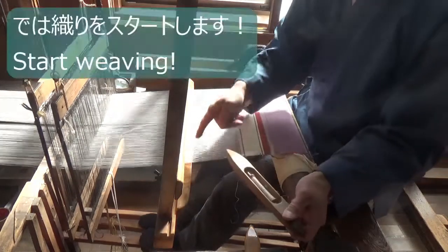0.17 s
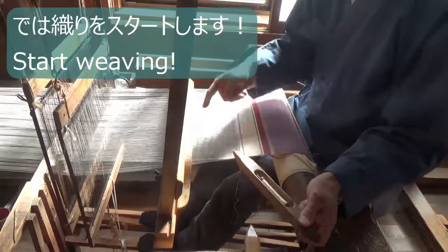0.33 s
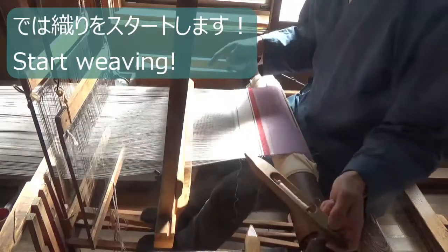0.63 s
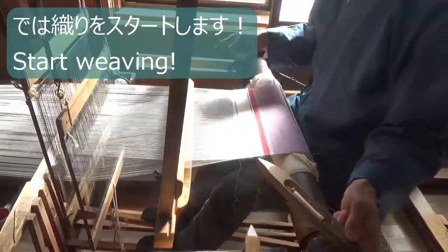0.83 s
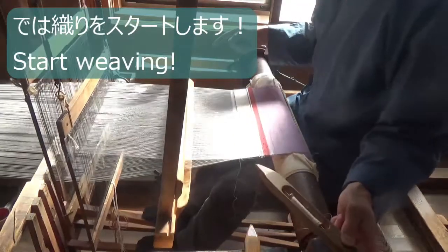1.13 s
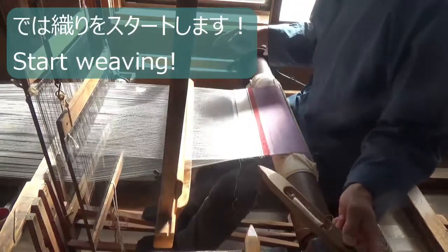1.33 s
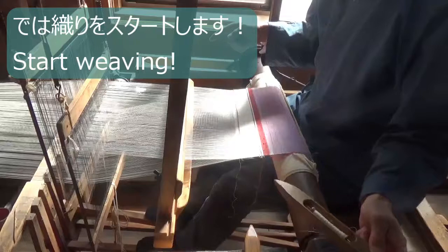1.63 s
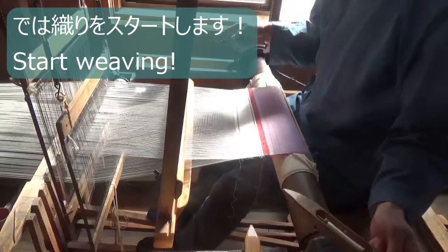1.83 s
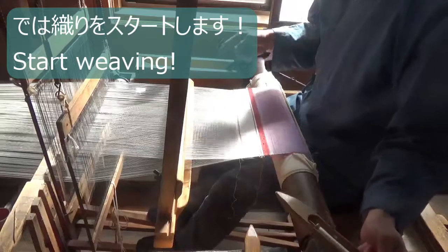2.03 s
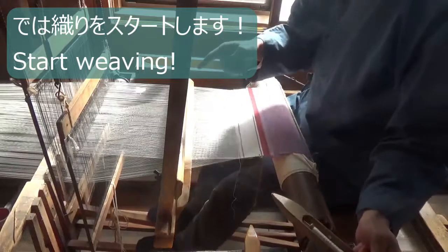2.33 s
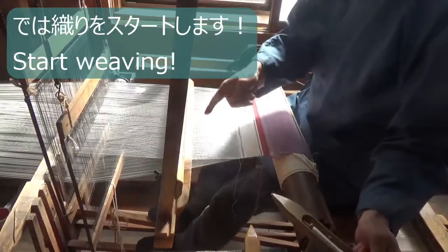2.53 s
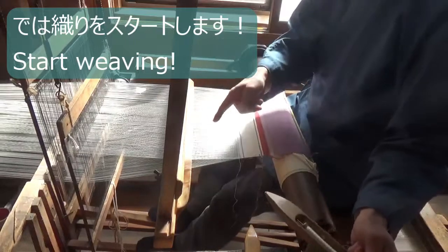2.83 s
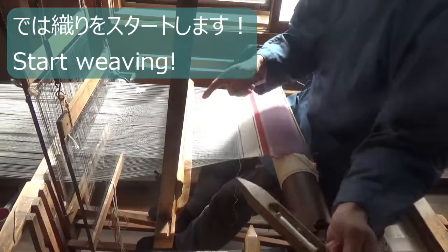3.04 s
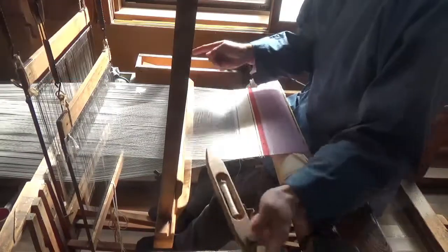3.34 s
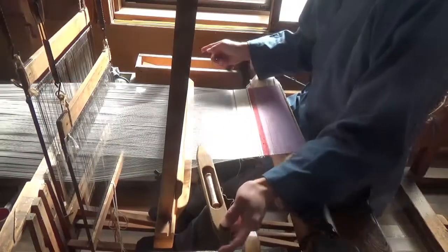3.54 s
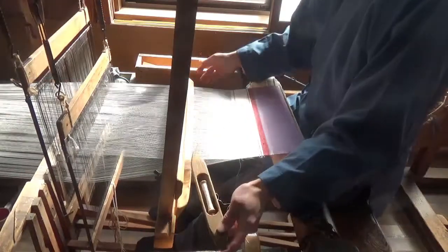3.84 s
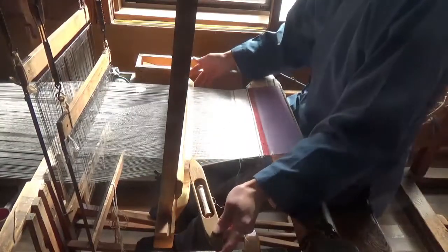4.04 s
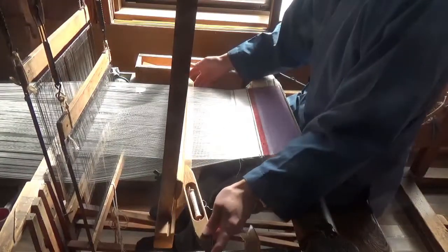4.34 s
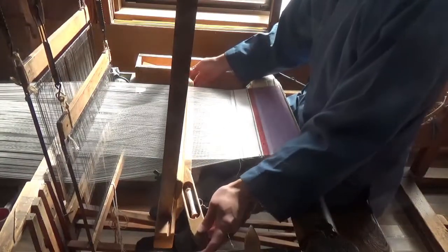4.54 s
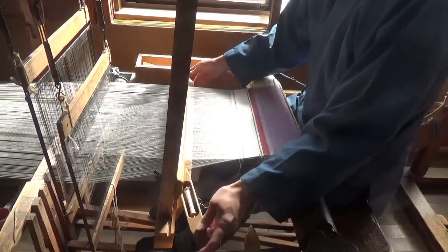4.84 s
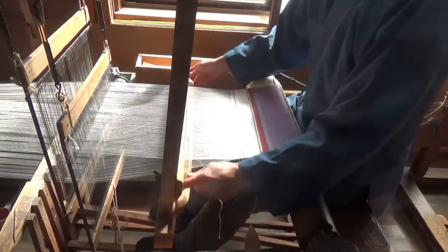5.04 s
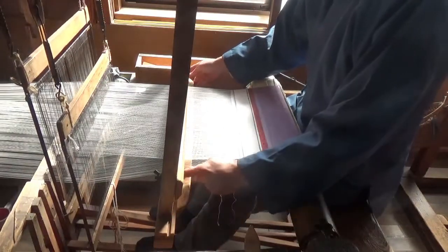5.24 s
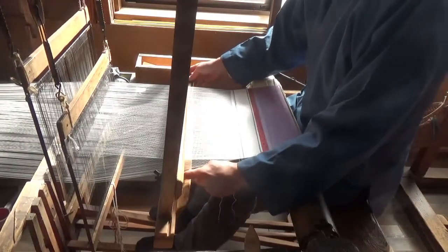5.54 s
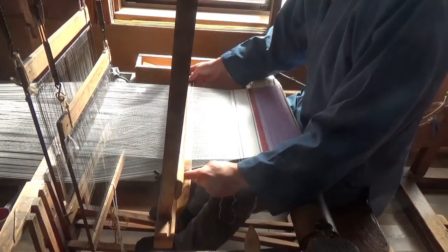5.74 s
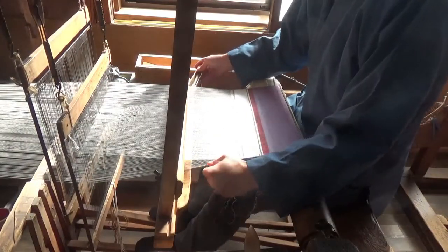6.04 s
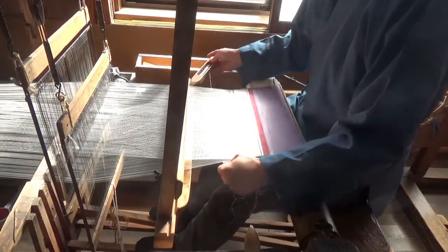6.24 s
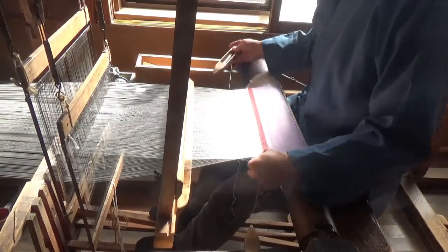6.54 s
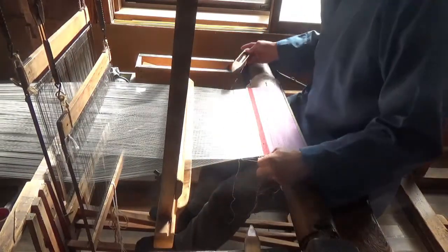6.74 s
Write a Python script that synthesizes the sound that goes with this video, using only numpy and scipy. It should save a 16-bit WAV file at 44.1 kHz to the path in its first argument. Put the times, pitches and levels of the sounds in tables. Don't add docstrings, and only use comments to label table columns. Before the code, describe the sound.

A wooden handloom heard close in a small, quiet workshop with a short reverberation, soft hiss and a very faint low machine hum. At 0.2 s a firm clack and heddle rattle come with a brushing scrape and sleeve rustle, then a hard wooden knock at 0.36. From 0.5 to 3.5 s a steel hook swings, ticking about every sixth of a second, gradually fainter. A shuttle clack falls at 0.6, a sharp ringing stick strike at 1.75, woody knocks at 1.84, 2.0 and 2.96, with dull treadle thuds between. It grows sparse until a strong beater clack with small rebounds at 4.44. From 4.88 to 5.3 s the thrown shuttle makes a loud, dense, bright clattering rattle, dying by 5.5. Light clicks and sliding follow, with a cluster of clacks at 6.0-6.2 as it is lifted out, another at 6.33, then quiet cloth rustle.

```python
import sys
import numpy as np
from scipy import signal
from scipy.fft import rfft, irfft, next_fast_len
from scipy.io import wavfile

SR = 44100
rng = np.random.default_rng(int(sys.argv[2]) if len(sys.argv) > 2 else 0)


def volts(x):
    e = np.asarray(x, float) / 20
    return 10 ** e


def transcribe(signal):
    frames = np.atleast_2d(signal).T
    limited = np.clip(frames, -1, 1)
    pcm = np.round(limited * 32767).astype(np.int16)
    wavfile.write(sys.argv[1], SR, pcm)


N = 303408

# (frequency [Hz], width [Hz], level [dB])
FRAME_MODES = [(170, 19, 9), (282, 187, 0), (426, 80, 0.5), (559, 67, 1.5), (714, 114, 1),
               (1005, 680, -2.5), (1620, 980, -4)]
# (frequency [Hz], width [Hz], level [dB])
RACE_MODES = [(170, 18, -5), (370, 103, -5), (530, 123, -2), (824, 95, -7), (1065, 106, -1),
              (1670, 390, -9)]
# (time [s], hiss level [dB], hum level [dB])
BACKGROUND = [(0, -51.5, -65), (.25, -53.5, -62.5), (.6, -52.5, -69.5), (1.16, -57.5, -58),
              (1.45, -57, -60), (1.68, -55, -52.5), (1.8, -52, -65), (2.2, -52.5, -65), (2.73, -56.5, -61),
              (3.07, -55, -59), (3.3, -57.5, -58), (4.4, -57.5, -60), (4.7, -58, -70), (4.9, -53, -62),
              (5.62, -58.5, -66), (5.85, -60.5, -78), (6.2, -59.5, -65), (6.88, -55.5, -70)]


def unit(x):
    return x / np.sqrt(np.mean(x ** 2) + 1e-20)


def along(points, hz):
    f, v = np.transpose(points)
    return np.interp(np.log(hz + 1), np.log(f + 1), v)


def curves(rows):
    s, *cols = np.transpose(rows)
    return [np.interp(np.arange(N) / SR, s, c) for c in cols]


def filtered(x, response):
    m = next_fast_len(x.shape[-1] + 2048)
    return irfft(rfft(x, m) * response(np.fft.rfftfreq(m, 1 / SR)), m)[..., :x.shape[-1]]


def body(modes):
    def response(f):
        total = 0
        for k, (centre, width, db) in enumerate(modes):
            damping = 1j * f * width
            total = total + (-1) ** k * volts(db) * damping / (centre * centre - f * f + damping)
        return total
    return response


def burst(t60, rise, response, snap=0, size=6000):
    t = np.arange(size) / SR
    force = rng.standard_normal(size) * volts(-60 * t / t60) * (1 - np.exp(-t / rise))
    force[1] += snap
    x = filtered(force, response)
    return x / np.abs(x).max()


def add(out, s, x, wet_db):
    # (frequency [Hz], t60 [s])
    room_decay = [(150, 0.68), (600, 0.3), (3000, 0.34), (6000, 0.27), (11000, 0.16)]
    # (frequency [Hz], level [dB])
    tail_width = [(150, -15.5), (900, -12), (3000, -21.5), (6000, -13), (11000, -6.5)]
    hz, t, z = signal.stft(rng.standard_normal((2, SR // 3)), SR, nperseg=256)
    z[1] *= volts(along(tail_width, hz))[:, None]
    decay = volts(-60 * t / along(room_decay, hz)[:, None])
    mid, side = signal.istft(z * decay, SR, nperseg=256)[1]
    tail = np.array([mid + side, mid - side]) / np.linalg.norm(mid)
    delayed = np.pad(x, (130, 0))[None]
    heard = volts(wet_db) * signal.fftconvolve(delayed, tail, axes=1)
    heard[:, :len(x)] += x
    part = out[:, max(round(s * SR), 0):][:, :heard.shape[1]]
    part += heard[:, :part.shape[1]]


def clacks():
    # (time [s], peak [dB], pitch [Hz], crack [dB], contact t60 [s])
    ready = [
        (0.1712, -26.5, 3300, -5, 0.13),
        (0.219, -14, 3400, -3, 0.012),
        (0.5988, -18, 4300, -9, 0.017),
        (0.9005, -30, 1550, -25, 0.015),
        (0.5994, -22, 2850, -12, 0.02),
        (1.465, -24, 5100, 17, 0.06),
        (2.0157, -17, 5900, 1, 0.047),
        (4.6932, -21, 2480, -4, 0.041),
    ]
    # (time [s], peak [dB], pitch [Hz], crack [dB])
    throw = [(4.877, -23, 2980, -15), (4.8872, -17, 3020, -20), (4.892, -6.5, 3660, -13),
             (4.905, -2, 4560, -2), (4.9145, 1, 5660, -4), (4.918, -3, 7000, -6), (4.9385, -8, 6700, 0),
             (4.958, 5.5, 6550, 14), (4.9796, -2, 4960, -4), (4.9875, -4, 5100, 3), (5.004, 6, 5300, -4),
             (5.0157, -2, 5100, -6), (5.027, 1, 5250, 3), (5.0297, 7.5, 9500, 5), (5.04, -5, 3020, -8),
             (5.053, -7, 5200, -1), (5.0683, 3.5, 7900, -13), (5.081, 5, 5750, -5), (5.093, 1, 3100, -3),
             (5.099, -3, 8200, -6), (5.1118, 2, 4240, -5), (5.12, -6, 4200, -15), (5.129, -10, 6000, 0),
             (5.1352, 0, 5070, -2), (5.144, 0, 7000, -11), (5.163, -6, 3020, -12), (5.2094, 1, 2800, -2),
             (5.2185, -8, 2850, -3), (5.232, -8, 3030, -24), (5.2325, -6.5, 5270, -26),
             (5.243, -11, 2900, -32), (5.252, -8, 3080, -28), (5.264, -6, 2900, -23.5),
             (5.2731, -7.5, 3130, -32), (5.282, -11, 3000, -24), (5.295, -7, 6640, -7),
             (5.3, -12, 6750, -8)]
    # (time [s], peak [dB], pitch [Hz], crack [dB])
    catch = [(5.441, -24, 6940, -6), (5.453, -19, 4250, -14), (5.458, -24, 6700, -15),
             (5.559, -30, 1950, -30.5), (5.7745, -28, 4400, -9), (5.8368, -34, 2550, -26),
             (5.9098, -21, 6840, -12), (6.003, -22, 3300, -3), (6.0095, -24, 6900, -4),
             (6.0408, -8, 3500, -4), (6.043, -12.5, 7500, -11), (6.047, -17, 4870, -12),
             (6.063, -20, 3120, -9), (6.0872, -18, 4800, -2), (6.106, -11.5, 3400, -4),
             (6.108, -24, 7800, -8), (6.1355, -16, 3900, -2), (6.142, -25, 4800, -6),
             (6.159, -18.5, 8200, -3), (6.327, -18, 4780, -6.5), (6.4725, -33.5, 3670, -16)]
    rows = [(*row, -24.5) for row in ready]
    rows += [(*row, 0.018, -30.5) for row in throw]
    rows += [(*row, 0.016, -61) for row in catch]
    out = np.zeros((2, N))
    for s, db, hz, crack_db, t60, thump_db in rows:
        def colour(f):
            pitch = body([(hz, 0.17 * hz, 0)])(f) ** 2
            crack = body([(4500, 5500, 0)])(f) * 1j * f / (1500 + 1j * f) / (1 + 1j * f / 9000)
            return pitch + volts(crack_db) * crack
        blow = burst(t60, 0.0005, colour, snap=4, size=4500)
        thump = burst(0.04, 0.004, body(RACE_MODES), size=4500)
        add(out, s + 0.0006, volts(db - 3.0) * (blow + volts(thump_db) * thump), wet_db=-5.5)
    return out


def chatter(modes, per_s, spread_db, fill):
    draw = rng.random((2, N))
    hits = (draw[0] < per_s / SR) * volts(-spread_db * np.log(1.06 - draw[1]))
    shake = signal.lfilter([1], [1, -np.exp(-1 / (0.002 * SR))], hits)
    return unit(filtered((unit(shake) + fill) * rng.standard_normal(N), body(modes)))


def rattle():
    # (time [s], sliding [dB], pressure on the reed [dB])
    drags = [
        [(0.2, -45, 22), (0.216, -42.5, 7), (0.288, -74, 0), (0.33, -68, 13), (0.35, -51, -1)],
        [(4.83, -55, -40), (4.9, -32, 8), (4.95, -39, 10.5), (4.995, -22, -4), (5.03, -24, 7),
         (5.136, -24.5, 7.5), (5.2, -27.5, 1), (5.272, -27.5, 3.5), (5.39, -47.5, 1.5)],
        [(5.36, -44, -11), (5.43, -46.5, -18), (5.45, -40, -15), (5.5, -48, -12), (5.53, -86, -21),
         (5.565, -50.5, -21), (5.64, -100, -21)],
        [(5.776, -55, 12), (5.886, -61.5, 8), (5.92, -62, 0)],
        [(5.911, -52, 6), (5.96, -52, 10), (6.01, -46.5, 1), (6.04, -55, 5)],
        [(6.043, -48, 24), (6.085, -55.5, 17), (6.19, -67, 24), (6.24, -76, 4)],
    ]
    # (bar [dB], wires [dB], wires fade [dB per s], race [dB], shuttle [dB])
    touch = [
        (0, 6, -73, -12, 6),
        (2.5, 5.5, -1.5, 1, -16),
        (0, -3, 3, -5, -2),
        (0, -3, -21, 7.5, 1),
        (0, 2, 0, -7, 2),
        (0, -3.5, -12, -15, -1),
    ]
    # (frequency [Hz], width [Hz], level [dB])
    bar_modes = [(2524, 110, -10), (2900, 120, -7.5), (3110, 130, -10), (3540, 450, -11.5)]
    wire_modes = [(4620, 1600, -15), (4880, 520, -21.5), (4904, 240, 10), (6150, 710, 6.5), (7180, 1650, 3),
                  (8860, 580, -4.5), (9500, 810, -12), (9440, 210, -45.5), (11100, 780, -2)]
    shuttle_modes = [(1950, 410, 10.5), (4150, 430, 13.5), (6840, 140, 12.5)]
    out, t = np.zeros((2, N)), np.arange(N) / SR
    bar = volts(-8.5) * chatter(bar_modes, per_s=280, spread_db=14, fill=1.0)
    wires = volts(-7.5) * chatter(wire_modes, per_s=500, spread_db=2.5, fill=1.0)
    race = volts(-5.0) * chatter(RACE_MODES, per_s=83, spread_db=4, fill=1.0)
    shuttle = volts(5) * chatter(shuttle_modes, per_s=100, spread_db=1, fill=1.3)
    for rows, (bar_db, wires_db, fade_db, race_db, shuttle_db) in zip(drags, touch):
        slide_db, press_db = curves(rows)
        span = slice(round(rows[0][0] * SR), round(rows[-1][0] * SR))
        fading_db = wires_db + fade_db * (t[span] - rows[1][0])
        reed = volts(bar_db) * bar[span] + volts(fading_db) * wires[span]
        sliding = volts(race_db) * race[span] + volts(shuttle_db) * shuttle[span]
        drag = volts(slide_db[span]) * (volts(press_db[span]) * reed + sliding)
        add(out, rows[0][0], drag, wet_db=-8.0)
    return out


def frame_boom(db):
    return volts(db) * burst(0.28, 0.007, lambda f: body(FRAME_MODES)(f) / (1 + 1j * f / 450), size=12000)


def blows():
    # (time [s], peak [dB], contact t60 [s], frame boom [dB], room [dB])
    hits = [
        (0.1985, -13, 0.08, -31, -2.5),
        (0.2189, -24, 0.018, -34, 5),
        (1.7432, -34, 0.025, -16, -1),
        (1.7475, -9, 0.016, -15, -5),
        (1.7548, -12, 0.02, -16.5, -8),
        (4.433, -19, 0.03, -37, -4),
        (4.4418, -2.5, 0.014, -34, -6.5),
        (4.449, -12, 0.052, -43, 0.5),
        (4.466, -21, 0.056, -40, -3),
        (4.4782, -24, 0.03, -46, 4),
    ]
    struck = [0, 0, 1, 1, 1, 2, 2, 3, 3, 3]
    hardness = [
        1.5,
        5,
        3,
        1.5,
    ]
    # (frequency [Hz], width [Hz], level [dB])
    heddles = [(2340, 130, -9), (3370, 170, -4), (5400, 410, -9), (6420, 370, 1.5), (7540, 390, -5.5),
               (9100, 400, -7), (10850, 550, -10.5)]
    stick = [(1386, 40, -9), (1720, 130, -8), (2115, 60, 5), (2710, 70, -6), (3020, 90, -12),
             (3450, 45, -1), (3580, 37, -10.5), (4030, 60, -9), (4640, 46, -13.5), (4950, 50, -15),
             (5440, 60, -13), (6212, 67, -15), (6460, 70, -18), (8200, 3500, -24)]
    beater = [(1440, 440, -19), (1990, 116, -8.5), (2900, 380, -4.5), (3300, 335, 1), (3730, 530, -4),
              (5100, 910, -10), (7000, 800, -6), (8500, 880, -12), (9500, 1800, -27)]
    muffled = [(hz, width, db - 10 * (hz > 4500)) for hz, width, db in beater]
    parts = (heddles, stick, beater, muffled)
    out = np.zeros((2, N))
    for (s, db, t60, boom_db, room_db), which in zip(hits, struck):
        part = lambda f: body(parts[which])(f) + volts(-28.5) * body([(3000, 4000, 0)])(f)
        blow = burst(t60, 0.001, part, snap=hardness[which], size=12000)
        add(out, s, volts(db + 0.6) * (blow + frame_boom(boom_db)), wet_db=room_db)
    return out


def knocks():
    # (time [s], peak [dB], slat pitch [Hz], contact t60 [s], frame boom [dB])
    hits = [
        (0.36, -13.5, 2020, 0.021, -8.5),
        (1.8358, -18, 1960, 0.029, -10.5),
        (2.012, -28.5, 2120, 0.053, 0),
        (2.399, -39, 1980, 0.016, 4.5),
        (2.961, -19.5, 1850, 0.022, -8),
    ]
    # (ratio to slat pitch, width [Hz], level [dB])
    slat_modes = [(.48, 90, -8), (.67, 70, -10), (1, 120, 8), (1.22, 160, 6), (1.6, 260, -3)]
    out = np.zeros((2, N))
    for s, db, hz, t60, boom_db in hits:
        def slat(f):
            broad = body([(hz, 3000, 0)])(f) ** 2
            fine = 0.56 + body([(k * hz, width, level) for k, width, level in slat_modes])(f)
            return broad * fine / (1 + 1j * f / 4000) ** 3 + volts(-36)
        blow = burst(t60, 0.001, slat, snap=6.5, size=12000)
        board = volts(-6.5) * burst(0.12, 0.0014, lambda f: body([(0.75 * hz, 1500, 0)])(f) ** 2, size=12000)
        add(out, s + 0.001317, volts(db + 1.0) * (blow + board + frame_boom(boom_db)), wet_db=-6.0)
    return out


def hook():
    # (time [s], peak [dB], ring over scrape [dB])
    ticks = [(0.025, -21, -15), (0.5265, -22.5, -17), (0.5641, -28, -20), (0.717, -21, -13),
             (0.746, -15, -14.5), (0.8973, -16, -29), (0.9261, -14.5, -17), (1.082, -30, -4.5),
             (1.115, -21.5, -26), (1.253, -29, -5.5), (1.419, -24.5, -7.5), (1.6096, -29.5, -9.5),
             (1.985, -20, -17), (2.1802, -21.5, -8.5), (2.3492, -26, -2), (2.5257, -28, -1),
             (2.6933, -26, -1.5), (2.878, -34.5, 4.5), (3.052, -32.5, -1), (3.2355, -41, 5.5),
             (3.405, -34.5, -2), (3.57, -33.5, -4)]
    # (frequency [Hz], level [dB], t60 [s])
    hook_modes = [(2710, -12, 0.04), (3500, -8, 0.25), (4377, -2, 0.085), (5440, -8, 0.035),
                  (5771, -1, 0.07), (6500, 2, 0.045), (7690, 2, 0.05), (8130, -1, 0.02), (9790, -3, 0.05),
                  (10360, 0, 0.1), (10950, -5, 0.04)]
    scrape_body = body([(5660, 5300, 4.7), (10600, 9400, 1.3), (6170, 390, 9.6), (4300, 110, 1), (8130, 340, 1.4)])
    out, t = np.zeros((2, N)), np.arange(SR // 4) / SR
    for s, db, ring_db in ticks:
        ring = np.zeros(len(t))
        for hz, level, t60 in hook_modes:
            strength_db = level + rng.normal(0, 1.5)
            ring += volts(strength_db - 60 * t / t60) * np.sin(2 * np.pi * (hz * t + rng.random()))
        ring *= 1 - np.exp(-t / 0.00016)
        scrape = burst(0.029, 0.004, scrape_body, size=len(t))
        add(out, s, volts(db - 5.0) * (0.41 * volts(ring_db) * ring + 0.64 * scrape), wet_db=-1.5)
    return out


def streaks():
    # (middle [s], length [s], pitch [Hz], level [dB])
    glints = [(0.265, 0.11, 2360, -45), (0.325, 0.041, 2440, -42), (0.2, 0.094, 6800, -48),
              (0.27, 0.05, 9100, -37), (0.32, 0.025, 5700, -47), (3.4, 0.02, 3000, -56),
              (5.18, 0.05, 5400, -27.5), (5.33, 0.072, 6800, -36), (5.32, 0.054, 1084, -32.5),
              (5.47, 0.09, 1800, -44), (5.57, 0.08, 480, -50), (5.27, 0.077, 526, -30.5),
              (5.928, 0.012, 6800, -30.5), (5.975, 0.024, 7900, -46), (6.01, 0.028, 6900, -42),
              (5.93, 0.039, 4500, -40), (5.97, 0.04, 4200, -46), (5.945, 0.0395, 1960, -43),
              (5.99, 0.032, 3000, -43), (6.062, 0.028, 3000, -36), (6.2, 0.087, 3000, -57.5),
              (2.967, 0.013, 2940, -48), (1.842, 0.015, 2700, -38.5), (1.775, 0.0405, 2900, -34.5),
              (5, 0.19, 2900, -42)]
    out = np.zeros((2, N))
    for s, length, hz, db in glints:
        size = round(length * SR)
        glint = filtered(rng.standard_normal(SR // 5), lambda f: body([(hz, 170, 0)])(f) ** 2)
        add(out, s - length / 2, volts(db) * np.hanning(size) * unit(glint)[-size:], wet_db=-8.0)
    return out


def thuds():
    # (time [s], peak [dB], pitch [Hz], t60 [s])
    presses = [(0.769, -30, 148, 0.14), (0.862, -29.5, 423, 0.11), (0.899, -27.5, 437, 0.073),
               (0.936, -42, 410, 0.15), (1.503, -34.5, 505, 0.29), (1.534, -30, 444, 0.089),
               (1.588, -30, 184, 0.085), (1.885, -26, 179, 0.13), (2.025, -24, 205, 0.12),
               (2.293, -31, 160, 0.1), (2.456, -42, 242, 0.11), (3.033, -29, 199, 0.11),
               (3.813, -38.5, 426, 0.14), (3.94, -38, 305, 0.12), (4.308, -37, 400, 0.12),
               (4.689, -38.5, 480, 0.11), (5.798, -41, 170, 0.69), (5.886, -37, 370, 0.25),
               (5.928, -37, 162, 0.27), (5.99, -43, 175, 0.035)]
    out = np.zeros((2, N))
    for s, db, hz, t60 in presses:
        colour = lambda f: (body(FRAME_MODES)(f) * 0.27 + body([(hz, 80, 0)])(f)) / (1 + 1j * f / 900) ** 3
        add(out, s, volts(db) * burst(t60, 0.04 * t60, colour, size=12000), wet_db=-4.5)
    return out


def diffuse(spectrum):
    alike = lambda f: np.array([np.ones_like(f), 0.21 * (f + 200) / (f + 300)])
    noise = rng.standard_normal((2, N))
    mid, side = filtered(noise, lambda f: volts(along(spectrum, f)) * alike(f))
    return np.array([mid + side, mid - side]) / mid.std()


def sleeves():
    # (middle [s], length [s], level [dB])
    moves = [(0.284, 0.53, -38.5), (0.883, 0.35, -48.5), (1.532, 0.19, -47), (2.154, 0.76, -51.5),
             (3.11, 0.91, -53.5), (3.85, 1.63, -49), (4.44, 0.58, -52.5), (5.914, 0.51, -46.5),
             (6.338, 1.23, -46), (6.825, 0.33, -53)]
    # (frequency [Hz], level [dB per Hz])
    cloth = [(2500, -13), (4000, -11), (5500, -6.5), (7000, -9), (9000, -12), (11000, -10.5)]
    t, swell = np.arange(N) / SR, np.zeros(N)
    for s, length, db in moves:
        swell += volts(db) * np.cos(np.pi * np.clip((t - s) / length, -0.5, 0.5)) ** 2
    return volts(1.0) * swell * diffuse(cloth)


def hum():
    t = np.arange(N) / SR
    hum_db = curves(BACKGROUND)[1]
    low = unit(filtered(rng.standard_normal(N), body([(85, 5.2, 0)])))
    octave = unit(filtered(rng.standard_normal(N), body([(168, 8.2, 0)])))
    tone = volts(hum_db) * (1.22 * np.sin(2 * np.pi * 85 * t) + 0.63 * low)
    tone += volts(-69 + 8.5 * np.clip((t - 5.9) / 0.34, 0, 1)) * octave
    return volts([[-0.7], [0.7]]) * tone


def room_hiss():
    # (frequency [Hz], level [dB per Hz])
    hiss = [(12, -51), (20, -14.5), (81, -10), (114, -12.5), (161, -5.5), (194, -9.5), (312, -10),
            (375, -12.5), (920, -16.5), (1230, -17), (1690, -18), (2440, -21), (10200, -23.5),
            (11000, -24.5), (14300, -57), (22000, -120)]
    return volts(3.5 + curves(BACKGROUND)[0]) * diffuse(hiss)


def scene():
    upper = clacks() + rattle() + blows() + knocks() + hook() + streaks()
    loom = upper * volts([[0.3], [-0.3]]) + thuds() * volts([[0.9], [-0.9]])
    loom = filtered(loom, lambda f: (1j * f / (110 + 1j * f)) ** 2)
    return loom + sleeves() + hum() + room_hiss()


def roll_off(x):
    return signal.sosfilt(signal.butter(12, 12360, fs=SR, output="sos"), x)


def record(dry):
    # (frequency [Hz], left over right [dB])
    lean = [(90, -0.5), (170, 0.5), (350, 1.1), (600, 0)]
    top_hz = 11057
    x = dry / (1 + np.abs(dry / 0.63) ** 6) ** (1 / 6)
    x = filtered(x, lambda f: volts(along(lean, f) * [[0.5], [-0.5]]))
    leak = volts([[-43], [-30]])

    def band(f):
        return 1 / (1 + (f / top_hz) ** 260) + leak * (f > top_hz) / (1 + (f / 12300) ** 20)
    mid, side = filtered(np.array([x[0] + x[1], x[0] - x[1]]) / 2, band)
    return roll_off(np.array([mid + side, mid - side]))


dry = scene()
out = record(dry)
transcribe(out)
```